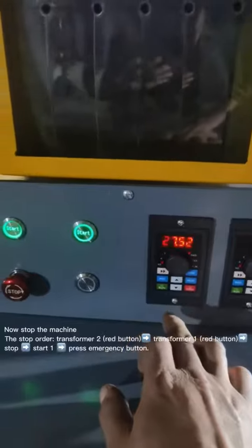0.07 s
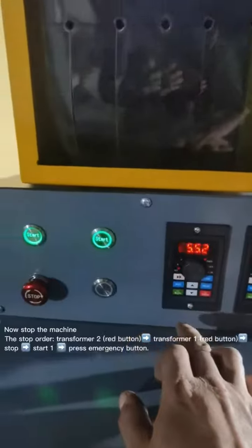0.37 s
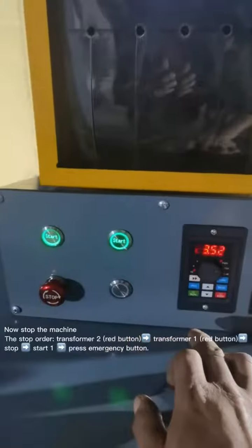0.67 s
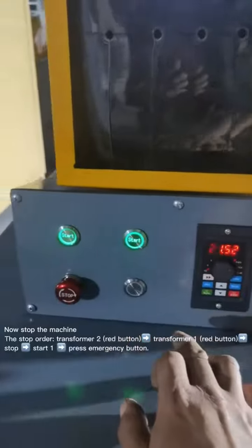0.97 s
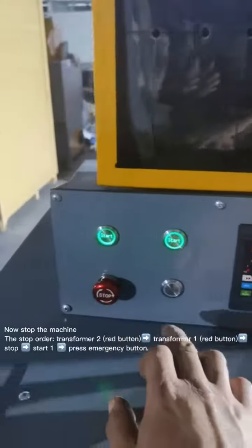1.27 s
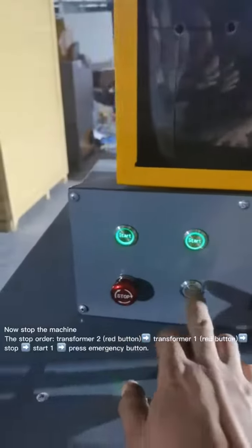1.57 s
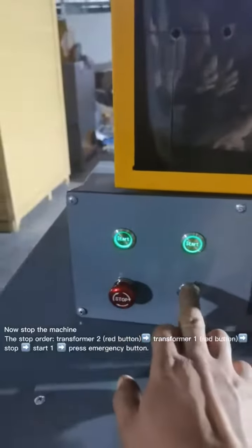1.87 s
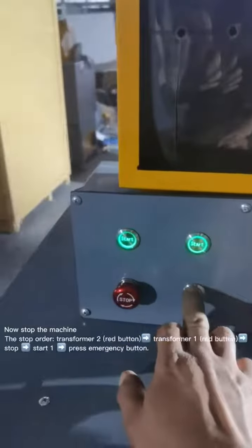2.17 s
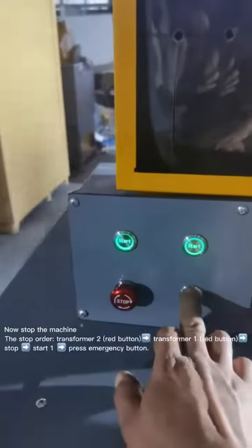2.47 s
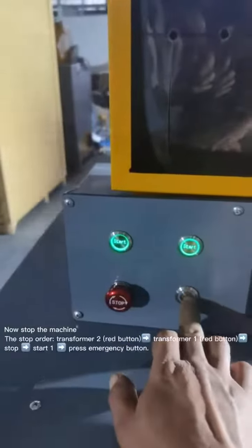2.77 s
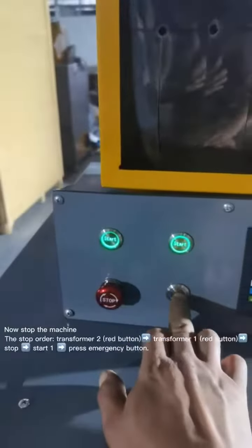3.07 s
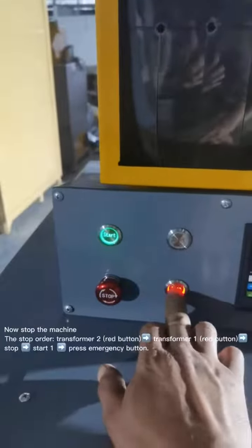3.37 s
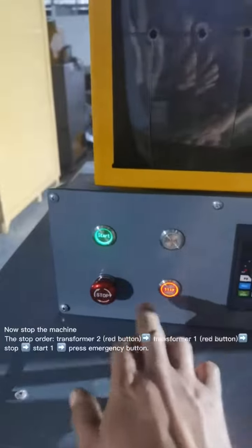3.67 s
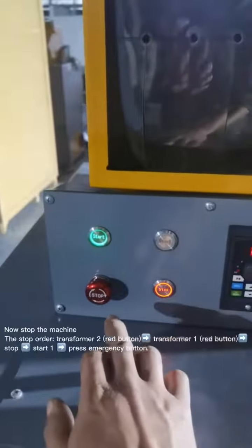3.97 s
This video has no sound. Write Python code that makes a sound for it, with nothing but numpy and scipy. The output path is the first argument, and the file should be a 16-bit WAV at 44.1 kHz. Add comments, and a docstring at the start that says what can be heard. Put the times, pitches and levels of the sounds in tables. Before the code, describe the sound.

A granulator runs with rattling metal granules and hum, then clacks and winds down.

```python
"""Cable granulator shutting down

Heard from the control panel in a workshop: metal granules seethe on a ringing shaker tray,
whose strokes slow until each is a separate swish. Motors hum underneath. A switch clacks,
a motor runs down and shakes the housing, and the hum drops away."""
import sys
import numpy as np
from scipy import signal
from scipy.fft import rfft, irfft
from scipy.io import wavfile
from scipy.ndimage import uniform_filter1d, map_coordinates

SR = 44100
rng = np.random.default_rng(int(sys.argv[2]) if len(sys.argv) > 2 else 0)


def generate_wav(signal):
    """Clip the signal to [-1, 1] and save it as 16-bit WAV at the path in sys.argv[1]."""
    frames = np.transpose(np.atleast_2d(signal))
    scaled = np.clip(frames, -1, 1) * 32767
    pcm = np.round(scaled).astype(np.int16)
    wavfile.write(sys.argv[1], SR, pcm)


N = 176400
SWITCH_S = 3.056


def undb(db):
    """Decibels to gain."""
    return 10 ** (np.asarray(db) / 20)


def unit(x):
    """Scale to rms 1."""
    return x / np.sqrt(np.mean(x ** 2))


def fader(t, rows):
    """Gain along rows of time in seconds and level in dB."""
    return undb(np.interp(t, *np.array(rows).T))


def wander(rate_hz):
    """Smooth random drift at rms 1."""
    hold = int(SR / rate_hz)
    steps = np.repeat(rng.standard_normal(N // hold + 1), hold)
    return unit(uniform_filter1d(uniform_filter1d(steps, hold), hold)[:N])


def colour(x, eq):
    """Shape a sound with an EQ curve, to rms 1."""
    hz, db = np.array(eq).T
    f = np.fft.rfftfreq(N, 1 / SR) + 1
    gain = undb(np.interp(np.log(f), np.log(hz), db))
    return unit(irfft(rfft(x) * gain, N))


def ring(x, modes, width_hz):
    """Drive narrow resonances of alternating polarity, to rms 1."""
    f = np.fft.rfftfreq(N, 1 / SR)
    response = sum((-1) ** k * undb(db) / (1 + 2j * (f - hz) / width_hz)
                   for k, (hz, db) in enumerate(modes))
    return unit(irfft(rfft(x) * response, N))


def tray(t):
    """Granules seethe and ring the tray; each stroke of the shaker throws them forward in a swish."""
    # Faders for the granule flow and the low ring. Each row: time in seconds, level in dB.
    flow_levels = [(0, -18), (.17, -21), (.24, -18), (.31, -20), (.37, -22), (.45, -22), (.58, -29),
                   (.63, -25.5), (.68, -26.5), (.82, -23.5), (.88, -21), (1.08, -21.5), (1.6, -20),
                   (1.85, -18), (2.0, -19), (2.14, -20.5), (2.22, -19), (2.52, -18.5), (2.65, -20.5),
                   (2.76, -24.5), (2.92, -28.5), (3.08, -25.5), (3.2, -28), (3.5, -32), (4, -34)]
    low_ring_levels = [(0, -43), (.3, -43), (.6, -43), (.85, -52), (.95, -39), (1.2, -38), (1.55, -34.5),
                       (2.2, -33), (2.6, -35.5), (2.9, -41.5), (4, -52)]
    # Tone of seething and of thrown granules. Each row: frequency in Hz, relative level in dB.
    seethe_eq = [(1500, -20), (2100, -10.5), (3100, -13.5), (3800, -10.5), (4800, -11), (5150, -6.5),
                 (5420, -2), (6900, -1), (7650, 3), (8450, 0), (9050, -10.5), (10900, -18.5),
                 (11600, -32.5), (14500, -31)]
    swish_eq = [(1200, -18), (1900, 2.5), (2350, 3), (3300, -4), (4400, 4.5), (5800, 9.5), (8300, -5),
                (9200, -21), (11000, -10), (12000, -30), (14500, -35)]
    # The tray's resonances. Each row: frequency in Hz, relative level in dB.
    low_modes = [(1890, -6), (2019, -4), (2110, -1), (2230, -6), (2643, -8), (2719, -8), (2850, -9),
                 (3106, -9), (3575, -4), (3801, -7), (4400, -8)]
    high_modes = [(5412, -3), (5469, 0), (5588, 0), (5636, 0), (5873, -2), (6218, 0), (6605, -1),
                  (6967, -4), (7565, -2), (7620, -3), (7680, -2), (8320, -5)]
    flow = fader(t, flow_levels) * undb(.6 * wander(29.98))
    seethe = undb(-1.39) * colour(granules(), seethe_eq)
    settling = np.interp(t, [3, 4.2], [1, .4])
    high_ring = settling * undb(-6) * ring(granules(), high_modes, width_hz=37)
    low_ring = fader(t, low_ring_levels) * ring(granules(), low_modes, width_hz=16.5)
    spill = undb(-24) * np.exp(-((t - .24) / .22) ** 2)  # a duller rush of granules at the start
    swish = np.hypot(undb(-29) * shaker_strokes(t), spill) * colour(granules(), swish_eq)
    return flow * (seethe + high_ring) + low_ring + swish


def shaker_strokes(t):
    """Swish envelope: the slowing shaker throws the granules, and they slide on between strokes."""
    stroke_hz, slowing_hz_per_s = 11.25, 4.56
    since = t - 3.022  # the rate passes stroke_hz here
    phase = (stroke_hz * since - slowing_hz_per_s * since ** 2 / 2) % 1
    rise, hold, fall = .12, .1, .17  # shares of a stroke
    throw = np.minimum(phase / rise, 1) * np.exp(-np.maximum(phase - rise - hold, 0) / fall)
    slide = .29 * (1 - throw)
    return throw + slide


def granules(hits_per_s=14000, sheet_t60_s=.19):
    """Countless tiny impacts, each followed by a short ring of sheet metal."""
    hits = (rng.random(N) < hits_per_s / SR) * rng.choice([-1, 1], N)
    hits = hits * undb(3 * np.minimum(rng.exponential(size=N), 5))  # a few land much harder
    age = np.arange(SR // 4) / SR
    tail = rng.standard_normal(len(age)) * np.exp(-np.log(1000) * age / sheet_t60_s)
    sheet = signal.fftconvolve(hits, tail)[:N]
    return shifting(unit(hits) + unit(sheet))


def shifting(x, patch_hz=170, patch_s=.042, depth_db=2.6):
    """Neighbouring frequencies swell and fade together as the granules shift about."""
    f, t, spectrum = signal.stft(x, SR, nperseg=1024)
    grid = np.meshgrid(f / patch_hz, t / patch_s, indexing="ij")
    patches = rng.standard_normal([int(axis.max()) + 2 for axis in grid])
    gain = undb(depth_db * map_coordinates(patches, grid))
    return unit(signal.istft(spectrum * gain, SR)[1][:N])


def tray_singing(t, waver_hz=18):
    """Sliding granules make single modes of the tray swell and fade."""
    # Each row: peak time in seconds, half length in seconds, pitch in Hz, relative level in dB.
    notes = [(.26, .08, 5490, -27), (1.1, .17, 2110, -34), (1.27, .12, 5610, -29), (1.48, .1, 2643, -34.5),
             (1.5, .06, 6966, -31), (1.85, .1, 6218, -29), (1.86, .17, 5466, -30), (2.4, .13, 2830, -37.5),
             (2.45, .12, 3106, -37.5), (2.5, .1, 6600, -29), (2.64, .13, 2019, -35)]
    out = 0
    for peak_s, half_s, hz, db in notes:
        swell = undb(db - 1.5) * np.exp(-((t - peak_s) / half_s) ** 2)
        tone = np.sin(2 * np.pi * np.cumsum(hz + waver_hz * wander(120)) / SR)
        flutter = undb(1.4 * wander(35.1))
        out = out + swell * tone * flutter
    return out


def mains_hum(t, throb_hz=4.6, buzz_off_s=3.22, hum_off_s=3.436):
    """The hum throbs and swells after the switch; its buzz fades first, then it drops away."""
    # Mains harmonics. Each row: frequency in Hz, relative level in dB.
    harmonics = [(100, -30), (200, -36.5), (300, -36)]
    # Deep shake of the frame under load. Each row: frequency in Hz, relative level in dB.
    shake_eq = [(20, -3), (60, 0), (120, -14), (400, -50)]
    surge_db = np.interp(t, [SWITCH_S, SWITCH_S + .13, hum_off_s], [0, 6, 0])
    fall_db = np.clip((hum_off_s - t) * 150, -23, 0)
    buzz_fade = undb(np.clip((buzz_off_s - t) * 130, -10, 0))
    throb_depth = np.interp(t, [0, SWITCH_S], [.44, .15])
    throb = 1 - throb_depth * np.cos(2 * np.pi * throb_hz * (t - 1.25))
    first, second, third = (undb(db + .6 * wander(12)) * np.sin(2 * np.pi * (hz * t + rng.random()))
                            for hz, db in harmonics)
    shake = undb(-59) * colour(rng.standard_normal(N), shake_eq)
    buzz = undb(2.5 * wander(18)) * second + third
    return (throb * first + buzz_fade * buzz + shake) * undb(1.5 + surge_db + fall_db)


def motor(t, off_s=3.15, run_down_s=1.1, housing_hz=170):
    """Rough shaft tones sink in pitch; those near the housing's resonance shudder and last longest."""
    # Shaft tones at full speed. Each row: frequency in Hz, level in dB.
    shaft_tones = [(93.2, -45), (209, -42), (217, -39), (249, -45), (313.9, -45), (383.5, -49)]
    coasting = np.maximum(t - off_s, 0)
    speed = np.exp(-coasting / run_down_s)
    shudder_db = 8.5 * np.exp(-((t - 3.36) / .12) ** 2)
    out = 0
    for hz, db in shaft_tones:
        pitch = hz * speed * (1 + .013 * wander(25.08))
        resonance = np.exp(-(np.log(pitch / housing_hz) / .43) ** 2)
        rough_db = 2.6 * wander(40)
        fade_db = 45 * (1 - resonance) * coasting
        gain = undb(db + rough_db + resonance * shudder_db - fade_db)
        out = out + gain * np.sin(2 * np.pi * (np.cumsum(pitch) / SR + rng.random()))
    return out


def switch(t, hold_s=.005, decay_s=.0081):
    """A short, dull clack behind the panel."""
    # Tone of the clack. Each row: frequency in Hz, relative level in dB.
    clack_eq = [(60, -13), (200, 9), (400, -4), (950, -3), (1500, -2.5), (3200, -2), (4500, -20),
                (12000, -40)]
    age = t - SWITCH_S
    envelope = (age > 0) * np.exp(-np.maximum(age - hold_s, 0) / decay_s)
    return undb(-25.5) * envelope * colour(rng.standard_normal(N), clack_eq)


def housing(t, drone_peak_s=3.41):
    """Panels rumble, air and cutters rush, and the slowing motor sets the housing droning."""
    # Low modes of the housing. Each row: frequency in Hz, relative level in dB.
    drone_modes = [(152, -1), (166, -3)]
    # Faders for the rumble and the rush. Each row: time in seconds, level in dB.
    rumble_levels = [(0, -34), (2.6, -33), (3.12, -34), (3.21, -27), (3.27, -29), (3.42, -31.5), (3.6, -36),
                     (4, -40)]
    rush_levels = [(0, -39), (2, -36.5), (3.15, -37), (3.5, -41), (4, -43.5)]
    # Their tone. Each row: frequency in Hz, relative level in dB.
    rumble_eq = [(25, -35), (50, -27), (80, -7), (115, -4.5), (150, -0.5), (220, -0.5), (320, -2),
                 (420, -10), (600, -25), (1200, -57)]
    rush_eq = [(200, -10), (450, 1.5), (600, 3.5), (800, -1.5), (1050, 0.5), (1600, -3.5), (2400, 0),
               (5000, -26.5)]
    drone_db = -32.5 - 26 * np.abs(t - drone_peak_s)
    drone = undb(drone_db) * ring(rng.standard_normal(N), drone_modes, width_hz=14)
    rumble = fader(t, rumble_levels) * colour(rng.standard_normal(N), rumble_eq)
    rush = fader(t, rush_levels) * colour(rng.standard_normal(N), rush_eq)
    return drone + rumble + rush


def scene():
    """The whole machine, the same in both channels."""
    t = np.arange(N) / SR
    mix = tray(t) + tray_singing(t) + mains_hum(t) + motor(t) + housing(t) + switch(t)
    return np.tile(mix, (2, 1))


def record(dry):
    """A steep low-pass takes off the top above 14.1 kHz."""
    return signal.sosfilt(signal.ellip(10, .2, 80, 14100, fs=SR, output="sos"), dry)


dry = scene()
out = record(dry)
generate_wav(out)
```